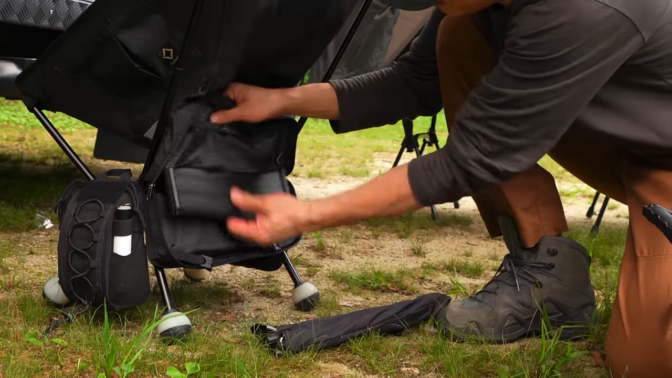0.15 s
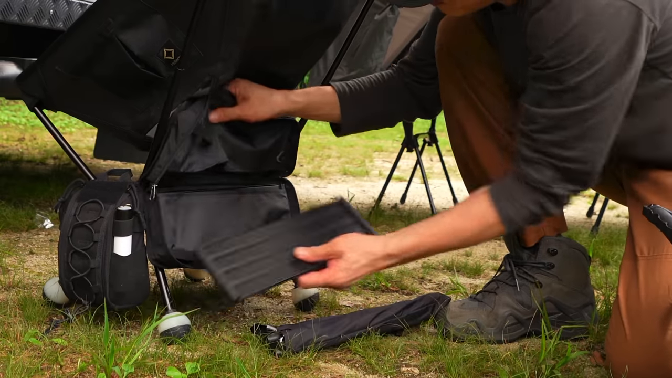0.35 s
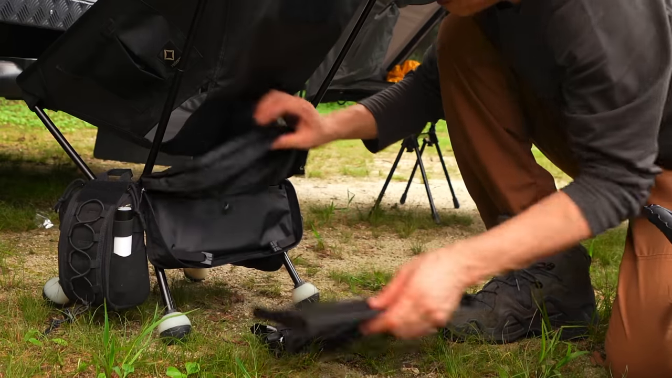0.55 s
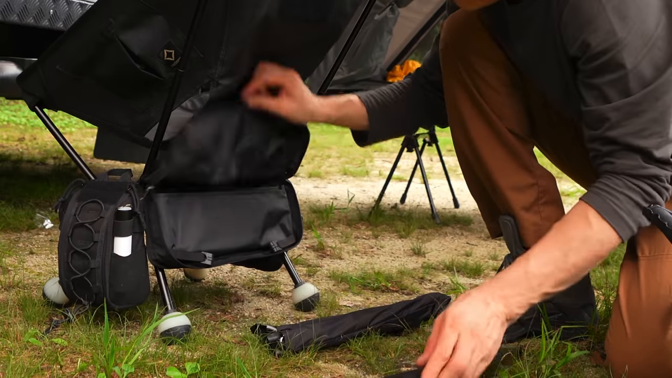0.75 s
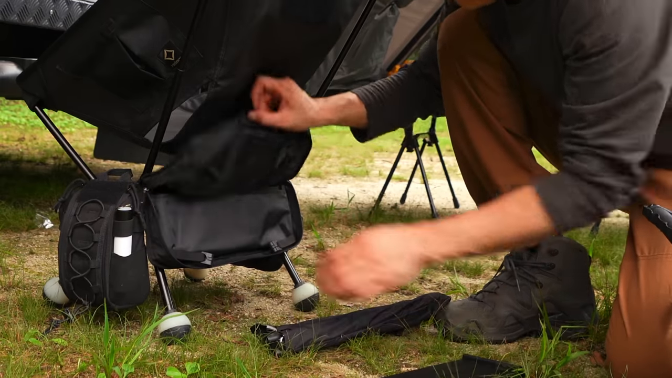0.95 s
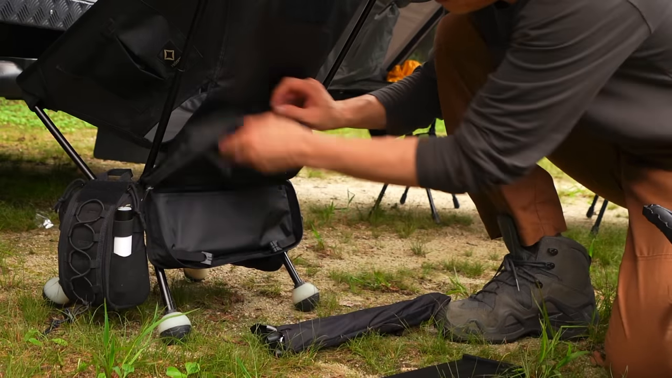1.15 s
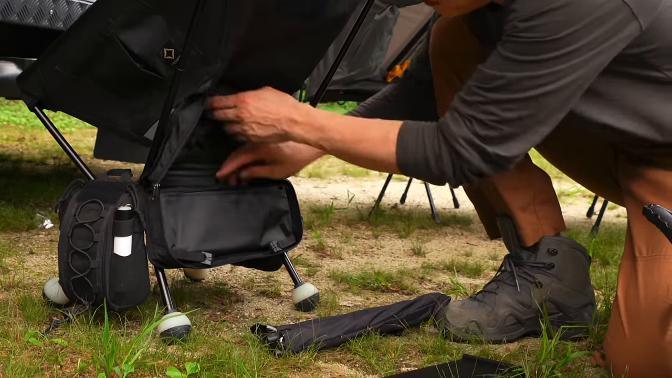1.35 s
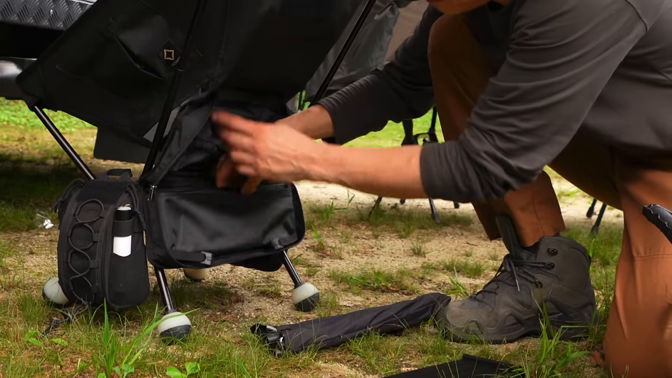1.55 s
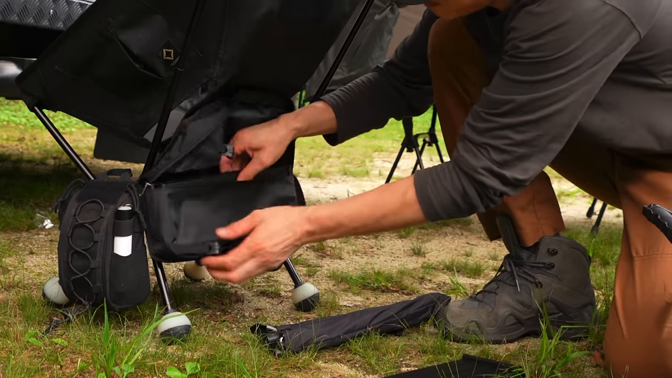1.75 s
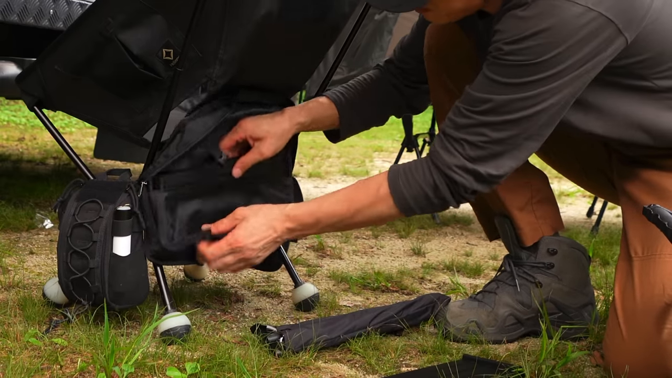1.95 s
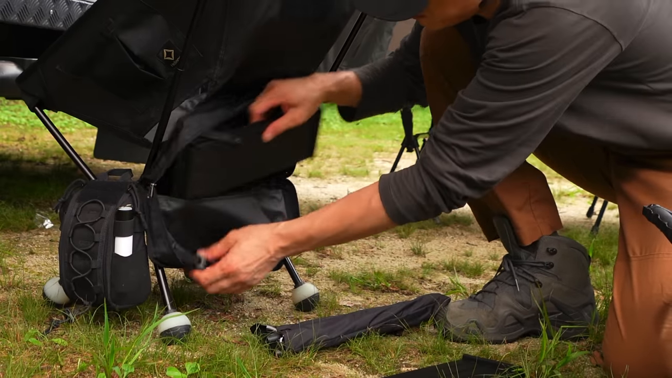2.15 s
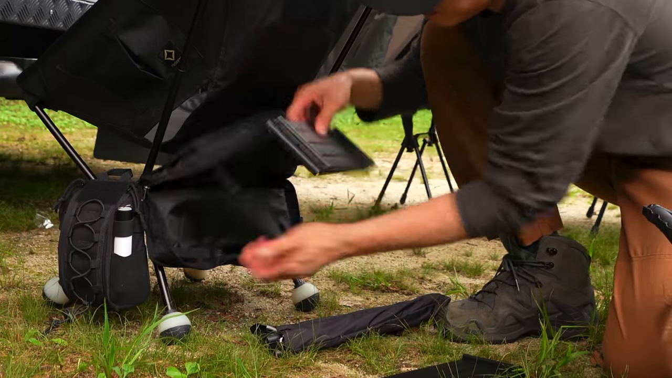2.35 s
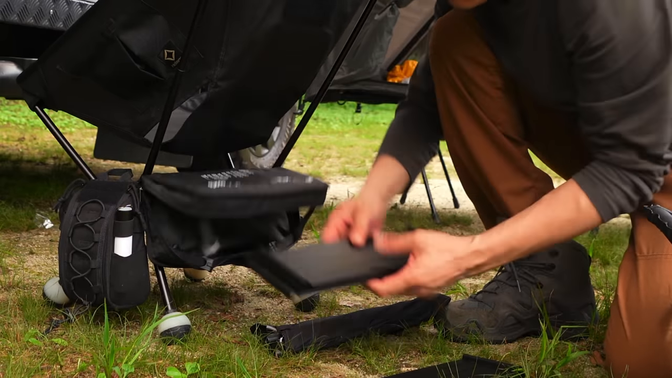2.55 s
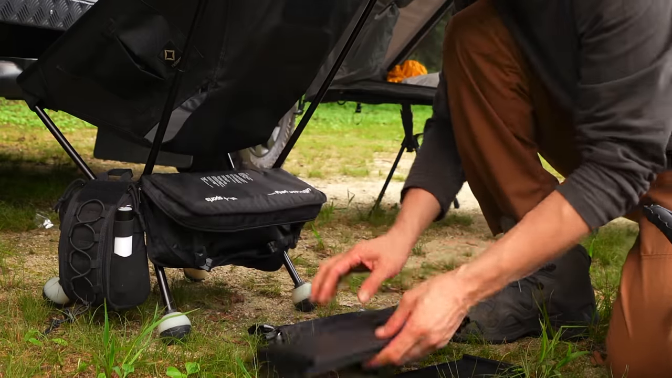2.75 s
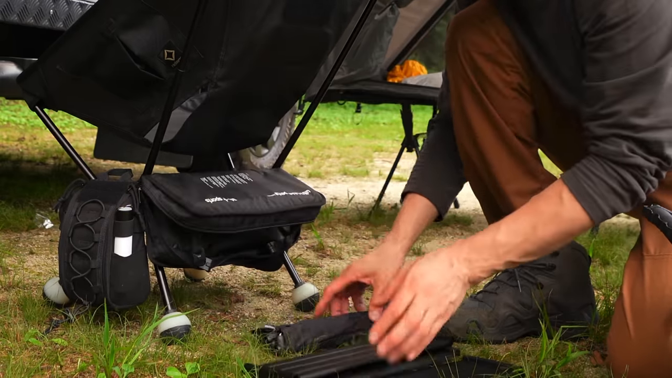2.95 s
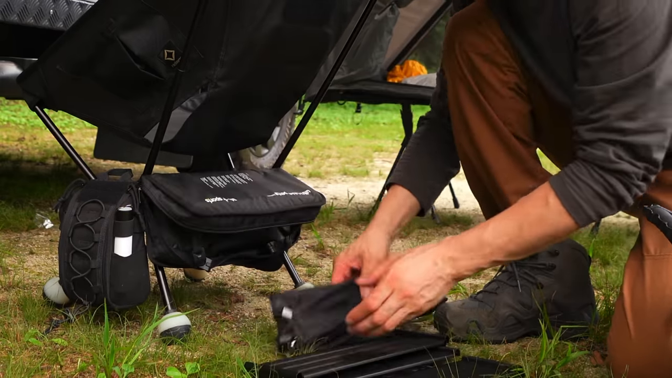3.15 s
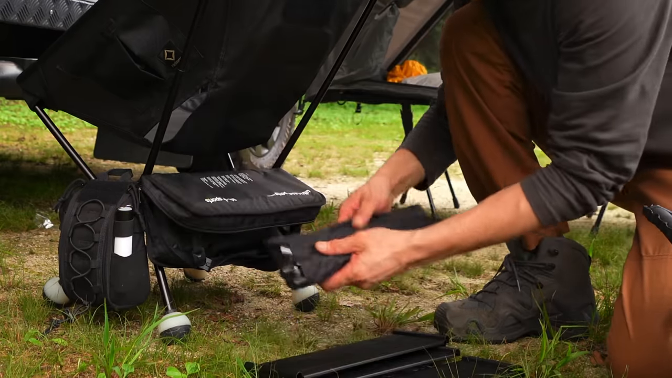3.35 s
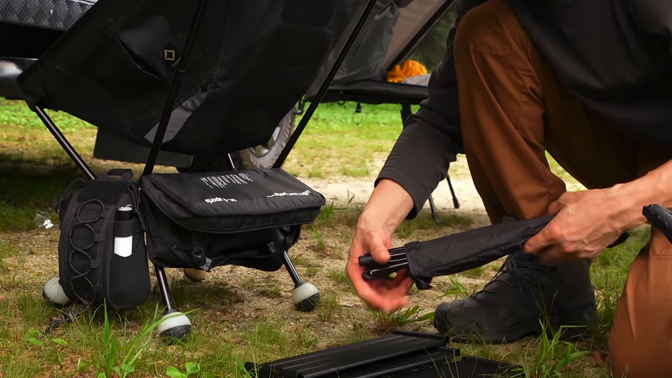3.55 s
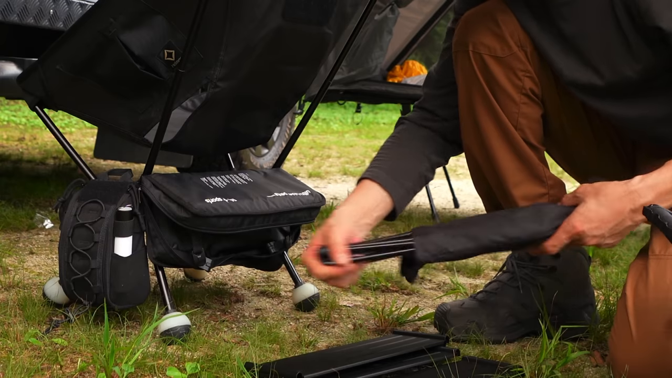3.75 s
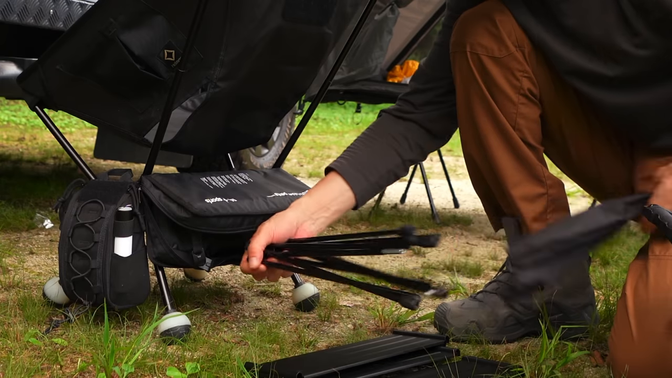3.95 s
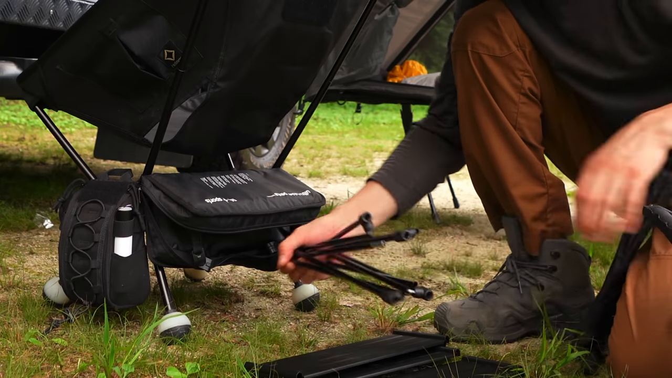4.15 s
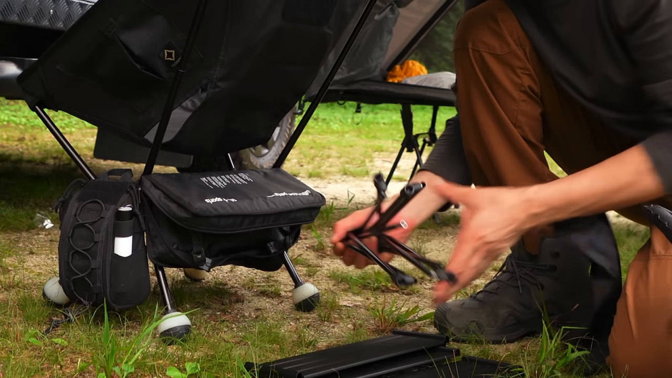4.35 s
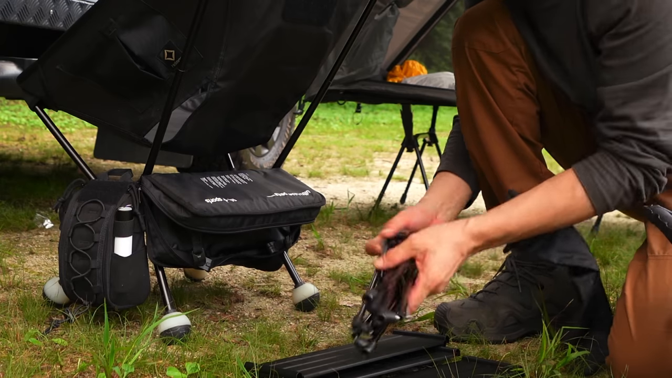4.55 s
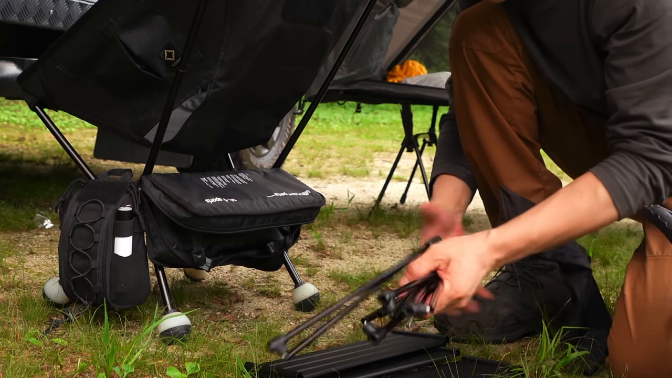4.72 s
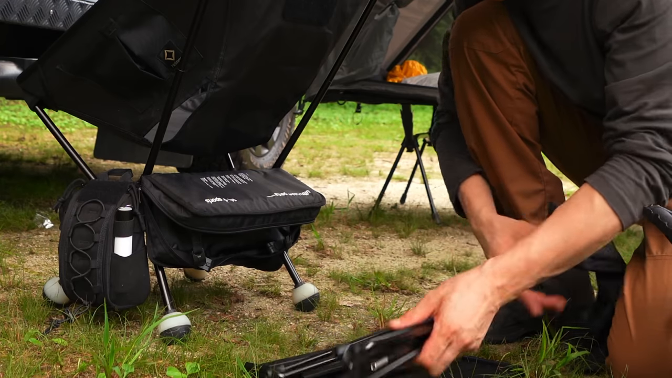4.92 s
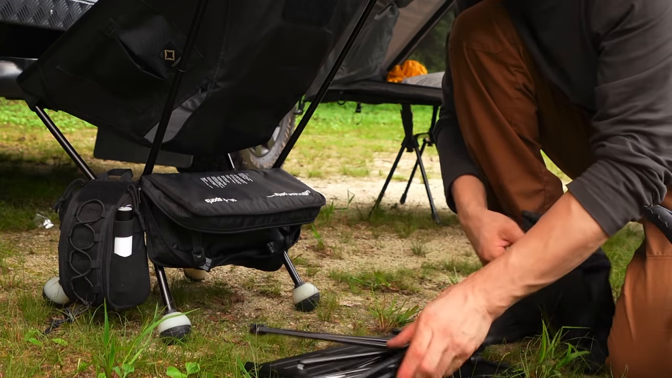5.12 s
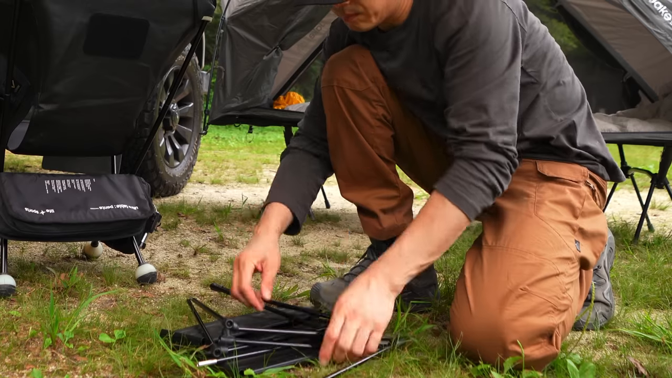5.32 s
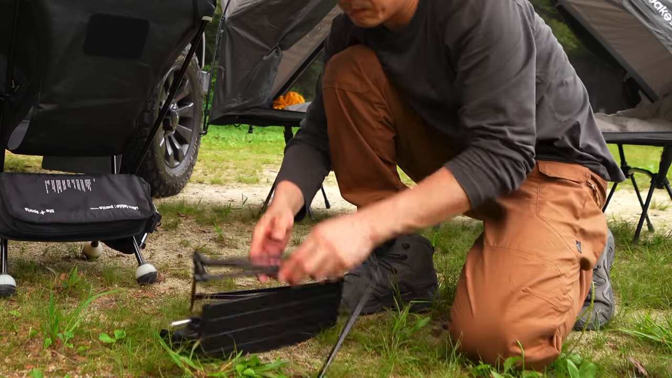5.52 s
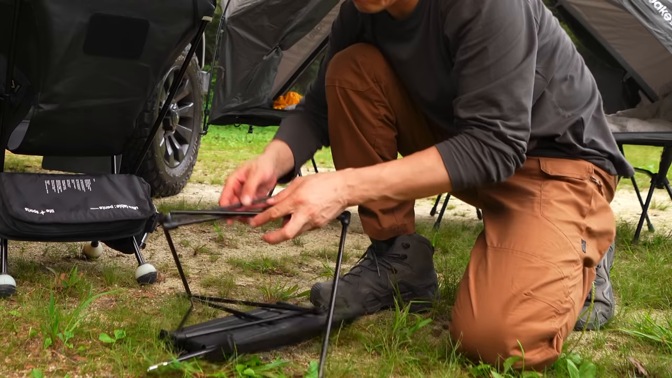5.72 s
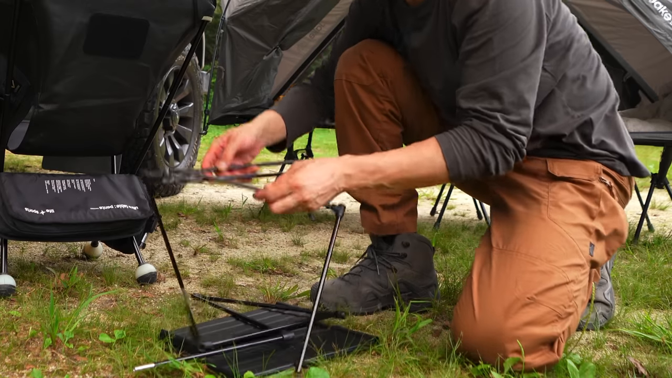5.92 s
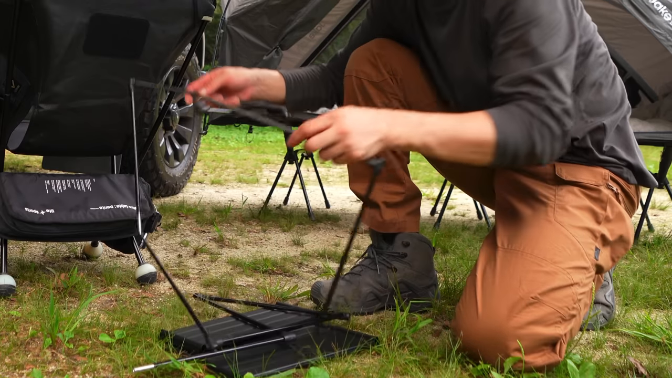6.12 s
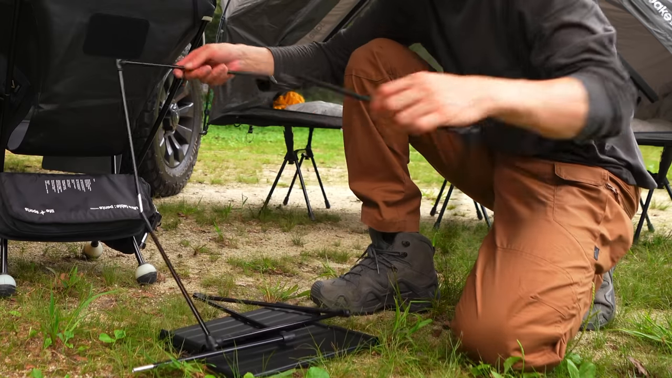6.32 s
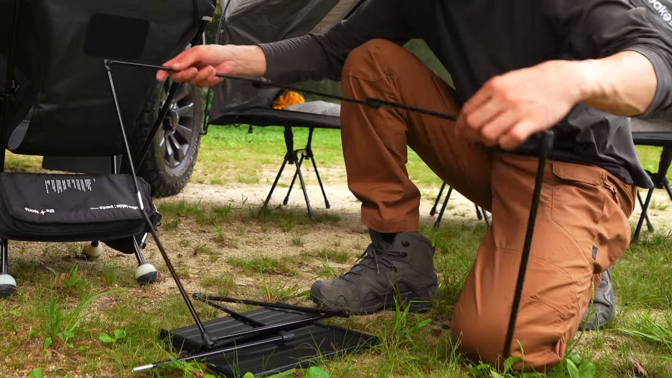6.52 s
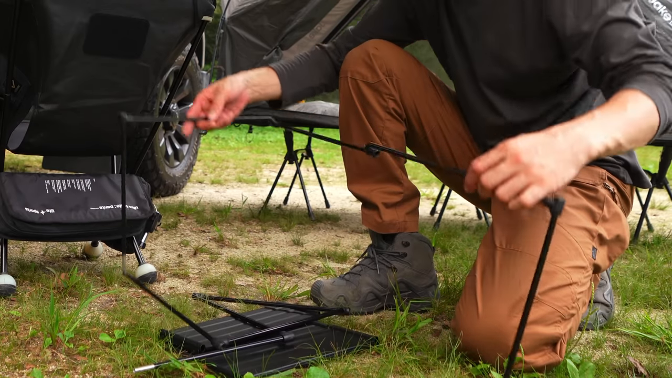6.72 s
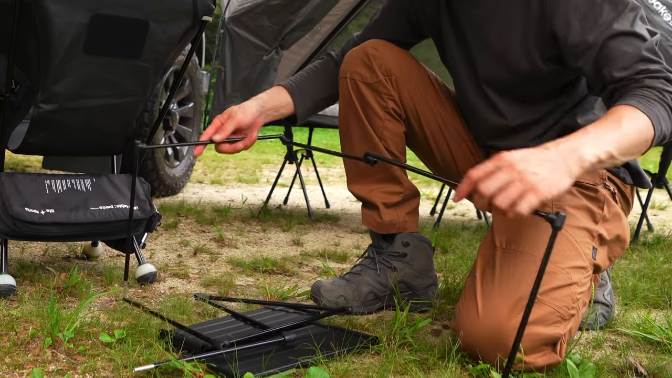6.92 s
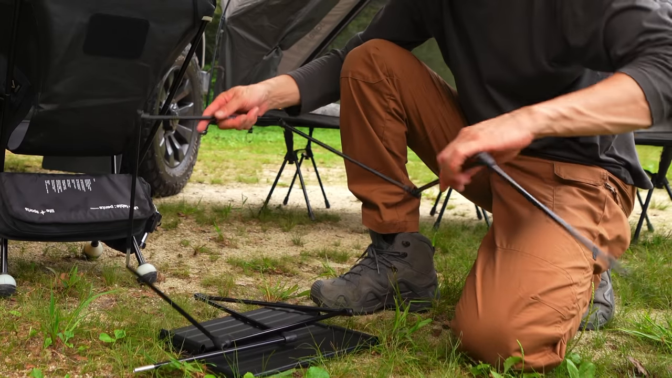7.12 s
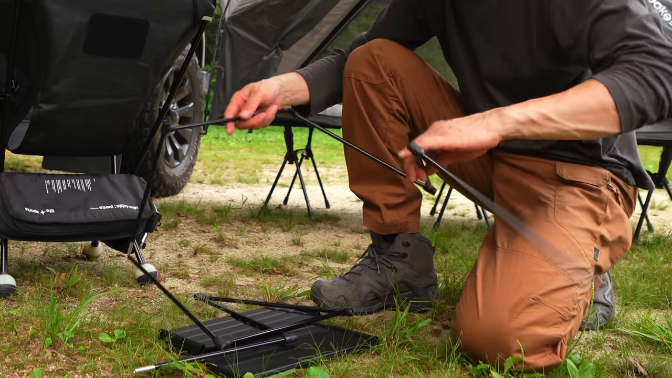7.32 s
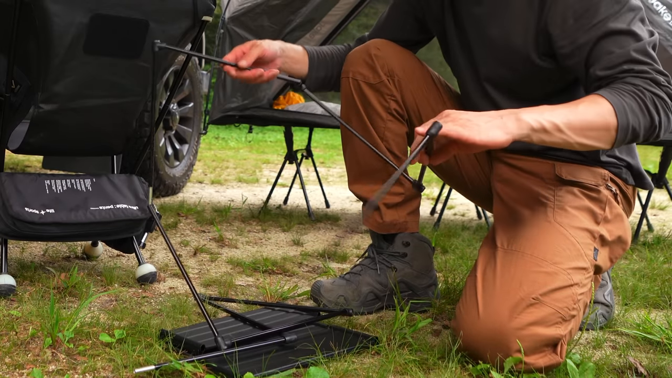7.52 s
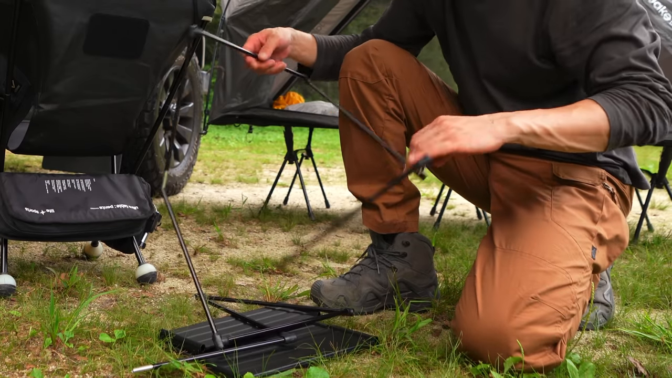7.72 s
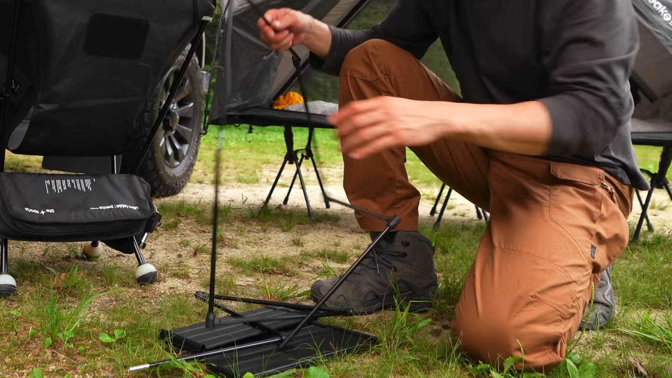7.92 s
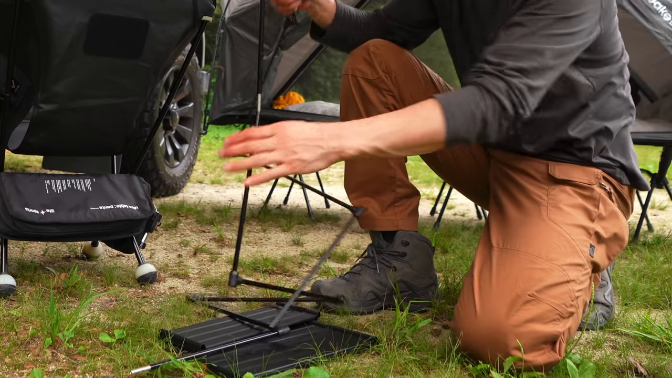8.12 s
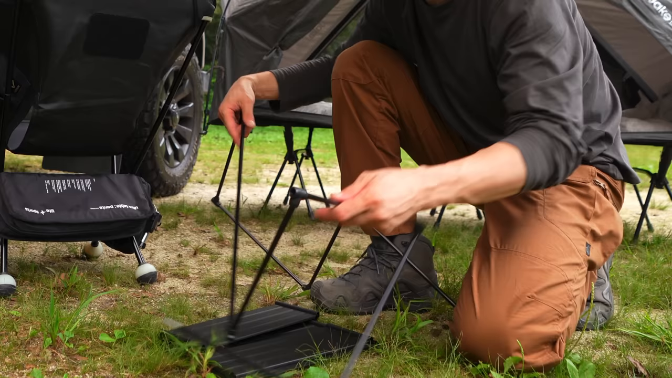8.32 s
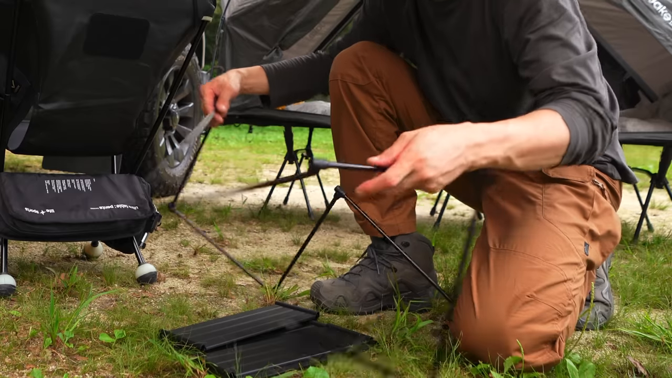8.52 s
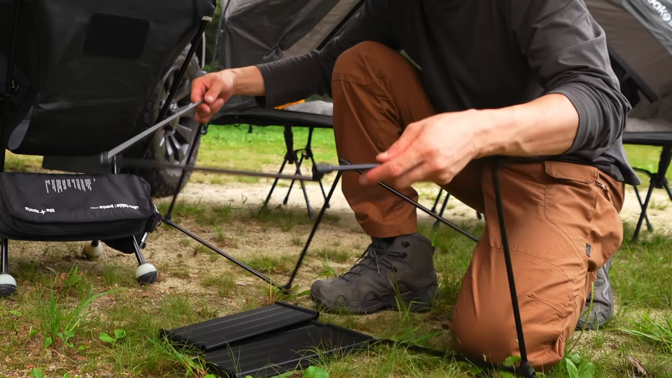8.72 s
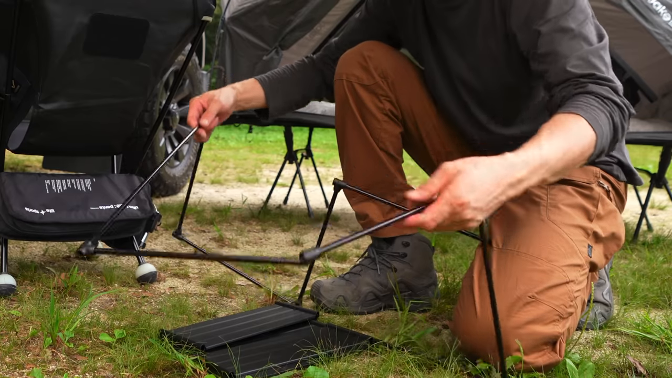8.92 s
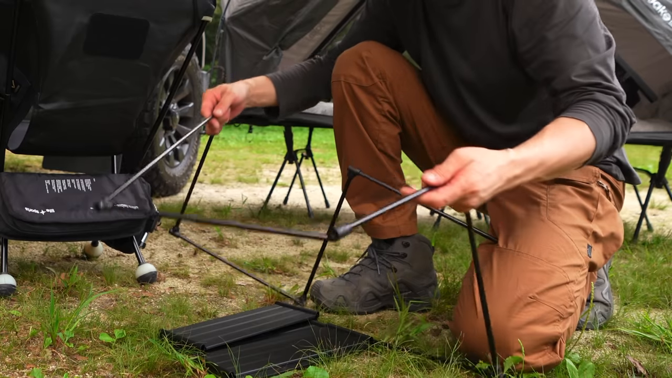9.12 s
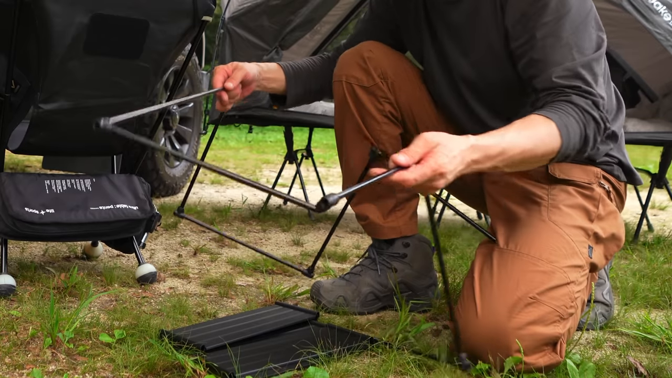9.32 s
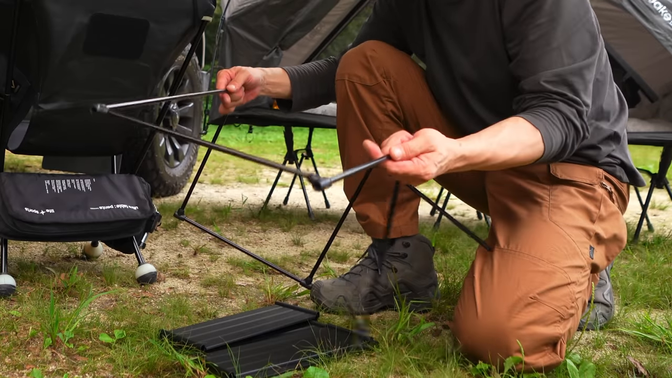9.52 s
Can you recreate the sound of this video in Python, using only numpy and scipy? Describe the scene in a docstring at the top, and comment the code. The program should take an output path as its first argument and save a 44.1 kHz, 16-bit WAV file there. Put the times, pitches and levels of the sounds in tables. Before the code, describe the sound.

A folding camp table is unpacked close by on grass, over a faint, steady outdoor hiss. Nylon bags rustle in quick strokes for the first four and a half seconds. A panel knocks, rings and squeaks at about 0.2 seconds and rattles at 0.8, followed by soft thuds and knocks. Aluminium slats clatter around 3 seconds, fabric creases snap, and thin rods click and clink brightly from 3.6 to 4.7. The densest, loudest metal clatter runs from about 4.8 to 6 seconds, with the close sounds cutting out for an instant near 5.3. Separate clacks, light taps and faint squeaks follow as the frame unfolds, with sharp hits at 6.2 and 7.5 and a ringing rattle around 8. A distant bird gives one short rising whistle at 8.4. Two more clacks come near 8.8, then a thin joint squeak around 9.4.

```python
"""A folding camp table is unpacked and put together on grass, close by, over a faint outdoor hiss.
Nylon bags rustle first; a panel is knocked and rings, a joint squeaks and creases snap. Bundled
aluminium slats and thin rods then clatter, each impact exciting their modes. Just after 5 s the close
sounds cut out for 70 ms while the hiss continues. Near the end a far bird whistles once, and the last
clacks and squeak follow. The loudest blows saturate at full scale."""
import sys
import numpy as np
from scipy import signal
from scipy.fft import irfft
from scipy.io import wavfile
from scipy.ndimage import uniform_filter1d

SR = 44100
rng = np.random.default_rng(int(sys.argv[2]) if len(sys.argv) > 2 else 0)


def dump_mix(stems):
    """Bounce the given channels to the path in sys.argv[1] as a 16-bit WAV at rate SR."""
    frames = np.atleast_2d(stems).T  # one column per channel
    limited = np.clip(frames, -1, 1)  # hard clip at full scale
    pcm = np.round(limited * 32767).astype(np.int16)
    wavfile.write(sys.argv[1], SR, pcm)


N = 426447
HOP = 128  # samples per envelope frame
FRAME_S = np.arange(N // HOP + 2) * HOP / SR


def amp(db):
    return 10 ** (np.asarray(db) / 20)


def unit_rms(x):
    return x / np.sqrt(np.mean(x ** 2) + 1e-20)


def spectrum_db(points, hz):
    """Interpolates a spectrum on a logarithmic frequency axis."""
    point_hz, db = np.transpose(points)
    return np.interp(np.log(hz + 1), np.log(point_hz + 1), db)


def add(mix, start_s, sound):
    part = mix[round(start_s * SR):][:len(sound)]
    part += sound[:len(part)]


def shelf(hz, zero_hz, one_hz):
    """Ramps from 0 at one frequency to 1 at another."""
    return np.clip(np.log((hz + 1) / zero_hz) / np.log(one_hz / zero_hz), 0, 1)


def power_sum(levels_db, *traits):
    """Incoherent sources add in power: returns their amplitude and each trait's power-weighted mean."""
    power = amp(levels_db) ** 2 + 1e-20
    total = power.sum(0)
    return np.sqrt(total), *((power * trait).sum(0) / total for trait in traits)


def per_sample(frames):
    return np.interp(np.arange(N) / HOP, np.arange(len(frames)), frames)


def coloured(x, spectrum, bass_db, treble_db, patchy_db):
    """Time-varying filter: a spectrum with moving bass and treble shelves and brief random patches."""
    hz, _, bins = signal.stft(x, SR, nperseg=4 * HOP, noverlap=3 * HOP)
    shape = amp(spectrum_db(spectrum, hz))
    shape /= np.sqrt(np.sum(shape[(hz > 1000) & (hz < 5000)] ** 2) / len(hz))
    patches = uniform_filter1d(rng.standard_normal(bins.shape), size=3, axis=0)
    patches = unit_rms(uniform_filter1d(patches, size=12, axis=1))
    tilt_db = np.outer(shelf(hz, 990, 320), bass_db) + np.outer(shelf(hz, 2660, 10700), treble_db)
    gain = shape[:, None] * amp(tilt_db + patchy_db * patches)
    return signal.istft(bins * gain, SR, nperseg=4 * HOP, noverlap=3 * HOP)[1][:N]


def shot_noise(pulse, per_s, spread_db):
    """Poisson process: one pulse recurs at random times, now and then much stronger."""
    strength = amp(spread_db * np.minimum(rng.exponential(1, N), 4))
    impulses = unit_rms(strength * (rng.random(N) < per_s / SR))
    return signal.oaconvolve(impulses, pulse)[:N]


def outdoor_hiss():
    """Broadband ambient noise whose spectrum drifts in patches."""
    # Each row: frequency in Hz, relative spectral density in dB.
    spectrum = [(12, -30), (20, 0.5), (153, -15.5), (191, -6.5), (246, -13), (299, -7), (364, -11.5),
                (691, -9), (10000, -22.5), (15700, -42)]
    hz = np.fft.rfftfreq(1024, 1 / SR)
    real, imag, patches = rng.standard_normal((N // 256 + 5, 513, 3)).T
    patches = unit_rms(uniform_filter1d(uniform_filter1d(patches, size=12, axis=0), size=14, axis=1))
    bins = (real + 1j * imag) * amp(spectrum_db(spectrum, hz)[:, None] + 0.99 * patches)
    return amp(-46.5) * unit_rms(signal.istft(bins, nperseg=1024, noverlap=768)[1][:N])


def cloth_rustle():
    """Sliding friction of fibres makes noise; snapping creases modulate it in short puffs."""
    # Rubbed cloth. Each row: frequency in Hz, relative spectral density in dB.
    spectrum = [(35, -49), (60, -16), (527, -5.5), (682, -5.5), (732, -4.5), (1110, -4.5), (1410, -2.5),
                (1550, -2.5), (8510, -12), (16000, -31.5)]
    # Strokes of cloth and grass. Each row: peak time in seconds, seconds to fade by 12 dB,
    # then relative level, bass and treble in dB.
    strokes = [(0.0, 0.0443, -23, -3, 0.5), (0.17, .08, -20, 2, 2.5), (0.255, .045, -18, -7, -0.5),
               (0.395, 0.06, -31, -1, -4), (0.5, 0.23, -40, 0, -0.5), (0.715, .05, -29, 2, -3),
               (0.795, .035, -30, 13, -1), (1.229, 0.0648, -27, 10, 4), (1.37, 0.1, -37.5, 15, -7),
               (1.43, 0.07, -33, 6, -7), (1.68, 0.1, -29, 1, -12), (1.83, 0.07, -22.5, -1, 0.5),
               (1.9, .08, -29.5, -1, -11), (2.031, .06, -16, -5, -3), (2.15, 0.05, -21.5, -5, -1.5),
               (2.2, .04, -28, 4, 0.5), (2.33, .07, -35.5, -11, -12), (2.48, .04, -31, -11, -11.5),
               (2.69, 0.07, -24.5, -7, -2.5), (2.77, 0.04, -33, 4, 0), (3.22, .06, -27, 0.5, -2),
               (3.34, .05, -32.5, 0, 4), (3.405, 0.04, -23, 2, 4.5), (3.49, .05, -29.5, -2, 5),
               (3.81, 0.11, -26, 5, 8.5), (3.9, .04, -30, 9, 7.5), (4.07, .08, -40, 4.5, 5),
               (6.72, 0.05, -30.5, -9, -18), (7.085, 0.08, -32.5, -7, -3), (7.6, .3, -46, -6, 0),
               (7.84, .02, -42, 14, -12), (8.1, .15, -36, -6, -6), (9.4, .15, -46, -8, 4),
               (8.44, .3, -47, -6.5, 5.5)]
    # Steady handling of the bags: start and end in seconds, then relative level, bass and treble in dB.
    handling = (0, 4.5, -46.5, 10, 4)
    start, end, steady_db, steady_bass_db, steady_treble_db = handling
    peak_s, fade_s, db, bass_db, treble_db = np.array(strokes).T[..., None]
    strokes_db = db - 12 * np.maximum(FRAME_S - peak_s, (peak_s - FRAME_S) / 0.91) / fade_s
    handling_db = np.where((FRAME_S >= start) & (FRAME_S < end), steady_db, -120)
    level, bass, treble = power_sum(np.vstack([strokes_db, handling_db]),
                                    amp(np.vstack([bass_db, steady_bass_db])) ** 2,
                                    amp(np.vstack([treble_db, steady_treble_db])) ** 2)
    puffs = shot_noise(np.exp(-np.arange(800) / (.004 * SR)), per_s=250, spread_db=3.0)
    slip = per_sample(level) * unit_rms((0.98 + unit_rms(puffs)) * rng.standard_normal(N))
    return amp(-2.2) * coloured(slip, spectrum, 10 * np.log10(bass), 10 * np.log10(treble), patchy_db=2.4)


def blows():
    """An impact excites dense, damped modes and rings a rod. Returns sound and force on the slats."""
    # Each row: time in seconds, relative level, thud and treble in dB, resonance in Hz,
    # midrange 60 dB decay time in seconds.
    impacts = [(0.2207, 3.5, -23, -20.5, 3280, 0.069), (0.319, -4.5, -22, -24.5, 2350, 0.094),
               (0.826, -9, -19, -38, 2530, 0.18), (0.789, -21.5, 22, -30, 900, 0.1),
               (1.168, -21, 20, -13, 900, 0.08), (1.354, -23, 18, -30, 1010, 0.1),
               (1.378, -20, 14.5, -30, 800, 0.06), (1.511, -13.5, -6, -49, 2200, 0.059),
               (1.5718, -20, -28, -33, 1540, 0.058), (1.6255, -17.5, -22, -37, 1910, 0.048),
               (1.6413, -7, -14, -28, 1920, 0.055), (2.2742, -1.5, -44, -25, 5300, 0.14),
               (2.0785, -11, -20, -24, 1480, 0.05), (2.139, -16, -25, -30, 1200, 0.2),
               (2.5347, -20, -1, -34, 1010, 0.07), (2.5716, -12.5, -16, -29, 1910, 0.071),
               (2.6304, -9, -20, -36, 1200, 0.15), (2.697, -12, -25, -35, 1500, 0.2),
               (2.8422, 3.5, -18, -15, 2200, 0.03), (3.0098, -2, -38, -15, 2110, 0.15),
               (3.2414, -6.5, -24, -12.5, 5640, 0.094), (3.619, -19, -30, -6, 8600, 0.086),
               (3.6462, -14, -32, -15, 6100, 0.11), (3.6707, -6.5, -46, -7, 4800, 0.1),
               (3.8306, -6.5, -18, -6, 5740, 0.15), (4.0196, -8, -43, -10.5, 8100, 0.063),
               (4.2268, -20.5, -30, -2, 8600, 0.078), (4.448, -6, -40, -7, 6570, 0.13),
               (4.469, -1.5, -51, -8, 2100, 0.05), (4.478, -4, -50, -8, 5200, 0.1),
               (4.504, -5.5, -42, -5, 8950, 0.058), (4.5408, -3, -33, 3, 5630, 0.16),
               (4.6018, -13, -37, -9, 8450, 0.13), (4.6391, -3, -50, -10.5, 8750, 0.13),
               (4.659, -4, -50, -10, 8500, 0.1), (4.8423, -2.5, -29, -14, 2120, 0.11),
               (4.987, -5, -31, -25.5, 2150, 0.082), (5.019, -2.5, -18, -26, 3180, 0.11),
               (5.077, 0.5, -23, -12.5, 1960, 0.14), (5.1429, -2, -27, -18, 1630, 0.15),
               (5.2043, -7, -29, -13, 5150, 0.063), (5.4169, 1.5, -22, -27, 2000, 0.046),
               (5.4559, -5, -25, -30, 2400, .1), (5.4813, -3, -25, -30, 2020, .1),
               (5.5826, -6, -20, -30, 1700, .1), (5.5406, -3, -9, -38, 2100, 0.095),
               (5.632, -0.5, -29, -12, 5900, 0.08), (5.665, 1.5, -42, -9, 1680, 0.12),
               (5.7467, -0.5, -38, -23, 1800, 0.17), (6.1417, -7.5, -26, -12.5, 2600, 0.13),
               (6.2154, 2, -9, -6, 6400, 0.13), (6.263, -8, -14.5, -33, 1530, 0.21),
               (6.496, -20, -30, -39, 1620, 0.14), (6.528, -19, -12, -47, 1490, 0.23),
               (6.5657, -19, -24, -24, 1590, 0.16), (6.6853, -22.5, -13, -32, 2320, 0.19),
               (7.097, -17.5, -36, -25, 1400, 0.035), (7.317, -11.5, -10, -12, 3900, 0.081),
               (7.4722, -1, -15, -9.5, 2680, 0.14), (7.8788, 3, -10, -4.5, 5130, 0.045),
               (8.036, -4, -38, -8, 9200, 0.08), (8.2019, -1, -35, -4.5, 5500, 0.13),
               (8.2463, -5, -20, -13.5, 6960, 0.1), (8.296, -13.5, -31, -8, 2400, 0.1),
               (8.347, -27, -15, -19, 4640, 0.068), (8.7124, -3, -17.5, -27, 4820, 0.17),
               (8.804, -2.5, -29, -19, 3680, 0.15), (9.2773, -25, -27, -16, 4830, 0.19)]
    # Nominal mode frequencies of a thin rod in Hz.
    rod_modes = [2400, 3560, 4800, 5950, 6900, 8500, 9800, 10750, 12400, 13400]
    t, hz = np.arange(8192) / SR, np.fft.rfftfreq(8192, 1 / SR)
    sound, force = np.zeros(N), np.zeros(N)
    high, low = shelf(hz, 1500, 4900), shelf(hz, 600, 250)
    attack, onset = np.minimum(t / 0.0016, 1), slice(250)
    for start, db, thud_db, treble_db, peak_hz, t60 in impacts:
        real, imag, roughness, scatter = rng.standard_normal((4, len(hz)))
        peak_db = (7.5 + 6 * shelf(peak_hz, 2000, 1400)) * np.exp(-(np.log((hz + 1) / peak_hz) / .1) ** 2)
        tilt_db = shelf(hz, 1450, 320) * thud_db + shelf(hz, 3030, 12500) * (treble_db + 11.5)
        shape_db = peak_db + tilt_db - 30 * shelf(hz, 200, 60) - 11.3 * shelf(hz, 6600, 16200)
        lumps_db = 5.2 * unit_rms(uniform_filter1d(roughness, size=12))
        bins = amp(shape_db + lumps_db) * (real + 1j * imag)
        thump = amp(8) * irfft(bins * low) * amp(-60 * t / 0.035) * attack  # the ground damps the bass
        body = irfft(bins * (1 - high - low)) * amp(-60 * t / t60) * attack
        top = irfft(bins * high) * amp(-60 * t / (0.76 * t60)) * np.minimum(t / 0.00033, 1)
        clack = (thump + body + top) * (1 + 0.4 * np.exp(-t / 0.0013))  # hard crack at contact
        rod_hz = np.array(rod_modes) * (1 + .012 * scatter[:len(rod_modes)])  # no two rods are alike
        rod_db = np.interp(rod_hz, hz, shape_db) + 3.0 * scatter[-len(rod_modes):]
        rod = (amp(rod_db)[:, None] * np.sin(2 * np.pi * rod_hz[:, None] * t)).sum(0)
        rod *= amp(-60 * t / (.78 * t60))
        rod_gain = amp(-1.5 + .22 * treble_db)  # bright blows are rod on rod and ring most
        blow = clack / np.std(clack[onset]) + rod_gain * rod / np.std(rod[onset])
        add(sound, start, amp(db - 8) * blow / np.sqrt(np.mean(blow[onset] ** 2)))
        add(force, start, amp(db - 26) * roughness[:60])
    return sound, force


def slat_ring(stack_force, loose_force):
    """Modal resonance: force is convolved with damped sines, weighted by how the slats are held."""
    # The flat panel. Each row: mode frequency in Hz, relative level in dB, 60 dB decay time in seconds.
    panel_modes = [(1200, 4, .25), (1287, -10, .7), (1453, -12, .35), (2350, -4, .17)]
    # Each row: mode frequency in Hz, relative level stacked and loose in dB, 60 dB decay time in seconds.
    slat_modes = [(509, -13, -20, .35), (744, -7, -35, 0.2), (1198, -4, -11, 0.25), (1286, -20, -9, 0.8),
                  (1470, -12, -15, 0.45), (1553, -6, -6, .45), (1730, 2, -22, 0.26), (1821, -8, -5, 0.3),
                  (2330, -2.5, -22, 0.3), (2590, -8, -10, 0.22), (2901, -23, 5, 0.45),
                  (3414, -8, -23, 0.25), (3560, -6, -12, 0.16), (4480, -13, -18, 0.27),
                  (4800, -5, -5, 0.14), (6380, -6, -10, 0.12)]
    t = np.arange(SR // 2) / SR
    panel = sum(amp(db - 60 * t / t60) * np.sin(2 * np.pi * hz * t) for hz, db, t60 in panel_modes)
    hz, stacked_db, loose_db, t60 = np.array(slat_modes).T[..., None]
    modes = amp(-60 * t / t60) * np.sin(2 * np.pi * hz * t)
    early = np.arange(N) < 1.1 * SR  # the panel is taken out first and rings in place of the stack
    ring = signal.oaconvolve(stack_force * early, panel)
    ring += signal.oaconvolve(stack_force * ~early, (amp(stacked_db) * modes).sum(0))
    ring += signal.oaconvolve(loose_force, (amp(loose_db) * modes).sum(0))
    return amp(-27) * ring[:N]


def squeaks():
    """Stick-slip friction gives narrow-band noise on a bending pitch: a joint squeaks, and near the end rubbed
    rods sing at their modes."""
    # Each row: start and end in seconds, first, middle and last pitch in Hz, width in Hz, level in dB.
    rubs = [(0.227, 0.31, 8260, 8500, 8300, 100, -34), (6.69, 6.78, 5950, 5880, 5950, 130, -49),
            (7.53, 7.849, 4640, 4720, 4800, 550, -52.5), (9.296, 9.465, 4750, 4850, 4700, 200, -48),
            (9.302, 9.455, 6540, 6550, 6200, 200, -52), (9.3, 9.46, 8900, 9000, 8600, 150, -58)]
    out = np.zeros(N)
    for start, end, start_hz, middle_hz, end_hz, width_hz, db in rubs:
        u = np.linspace(-1, 1, round((end - start) * SR))
        hz = middle_hz + u * (end_hz - start_hz) / 2 + u ** 2 * ((start_hz + end_hz) / 2 - middle_hz)
        pole = np.exp(-np.pi * width_hz / SR)
        noise = rng.standard_normal((2, SR // 2))
        real, imag = signal.lfilter([1], [1, -2 * pole, pole * pole], noise)[:, -len(u):]
        tone = ((real + 1j * imag) * np.exp(2j * np.pi * np.cumsum(hz) / SR)).real
        add(out, start, amp(db) * unit_rms(tone) * signal.windows.tukey(len(u), .4))
    return out


def clatter():
    """Dense collisions merge into noise and ring the tubes. Returns sound, stack and loose-slat force."""
    # Colliding metal. Each row: frequency in Hz, relative spectral density in dB.
    spectrum = [(59, -65), (100, -59), (411, -32), (508, -9), (589, -40), (758, -6), (1310, -8.5),
                (1730, 2.5), (8580, -7), (15500, -35.5)]
    # Each row: start, end and build-up time in seconds, then relative level, change by the end,
    # treble, drive of the stack and drive of a loose slat in dB.
    shakes = [(0.794, 0.913, .025, -12.5, -4, -3, -13, -60), (2.66, 2.734, 0.043, -23, -3, -13, -20, -45),
              (2.842, 2.993, 0.0034, -12.5, -0.5, 1.5, -22, -34),
              (3.002, 3.139, .02, -13, 0, -3.5, -22, -33),
              (4.469, 4.58, 0.031, -27.5, -5.5, 21.5, -45, -40), (4.6, 4.718, .02, -39, 1, 19, -45, -40),
              (4.845, 4.878, .002, -17, 2, -5.5, -22, -37),
              (4.992, 5.063, .04, -17.5, -2.5, -6.5, -20, -36), (5.078, 5.129, .01, -15, -1, -10, -19, -37),
              (5.15, 5.25, .01, -21, -1.5, 3, -20, -37), (5.334, 5.356, .004, -23, 1, -8, -18, -30),
              (5.419, 5.614, .05, -12.5, -2.5, -9, -13.5, -31),
              (5.622, 5.852, .02, -14.5, 1, 0, -13.5, -32), (5.85, 6.007, .02, -14, -4, 3, -13, -34),
              (7.881, 7.94, .003, -14.5, 0, -4, -24, -20), (7.947, 8.065, .01, -14.5, -4, -6, -19, -12)]
    start, end, build_s, db, sag_db, treble_db, stacked_db, loose_db = np.array(shakes).T[..., None]
    release_db_per_s = 420
    held_db = db + sag_db * np.clip((FRAME_S - start) / (end - start), 0, 1)
    build_db = 24.5 * np.maximum(start - FRAME_S, 0) / build_s
    release_db = release_db_per_s * np.maximum(FRAME_S - end, 0)
    dulling_db = 0.59 * release_db_per_s * np.clip(FRAME_S - end, 0, .1)  # treble dies first
    level, treble_db, stacked, loose = power_sum(held_db - build_db - release_db, treble_db - dulling_db,
                                                 amp(stacked_db), amp(loose_db))
    level = per_sample(level)
    bursts = shot_noise(np.exp(-np.arange(2000) / (.005 * SR)), per_s=260, spread_db=2.2)
    drive = level * unit_rms((0.76 + unit_rms(bursts)) * rng.standard_normal(N))
    t = np.arange(3000) / SR
    envelope = amp(-60 * t / 0.067) * np.minimum(t / .001, 1)
    tubes = sum(shot_noise(envelope * np.sin(2 * np.pi * hz * t), per_s=25, spread_db=3.2)
                for hz in np.geomspace(1250, 2500, num=10))
    tube_share = np.minimum(amp(-.6 * (per_sample(treble_db) + 5.5)), 1)  # dull shakes come from tubes
    knocks = coloured(drive, spectrum, np.zeros_like(treble_db), treble_db, patchy_db=3.0)
    sound = amp(-4.5) * knocks + amp(-6) * level * tube_share * unit_rms(tubes)
    jolt = np.zeros(N)  # the first contact sets a loose slat ringing
    jolt[(start[:, 0] * SR).astype(int)] = amp(db + loose_db + 36)[:, 0]
    return sound, per_sample(stacked) * drive, per_sample(loose) * drive + jolt


def snaps():
    """Creases and buckles give heavily damped transients of band noise; low ones last longer."""
    # Each row: start in seconds, relative level in dB, centre frequency in Hz.
    events = [(0.8154, -4, 2200), (1.1886, -19, 1500), (1.421, -20, 2000), (3.3238, -23, 5000),
              (3.3543, -17, 3600), (3.3887, -14, 1800), (3.424, -16, 2600), (3.451, -21, 4500),
              (4.2976, -25, 1700), (4.316, -25, 2500), (4.333, -27, 900), (4.3705, -25, 1700),
              (4.4278, -27, 6000), (8.647, -20, 700)]
    t, out = np.arange(2000) / SR, np.zeros(N)
    for start, db, hz in events:
        band = signal.butter(2, [hz / 1.3, hz * 1.3], "band", fs=SR)
        fuzz = unit_rms(signal.lfilter(*band, rng.standard_normal(len(t))))
        t60 = .025 + 40 / hz
        add(out, start, amp(db - 6 - 60 * t / t60) * np.minimum(t / .001, 1) * fuzz)
    return out


def far_bird():
    """A rising whistle is smeared by reverberation among the trees."""
    # Each row: time in seconds, pitch in Hz.
    glide = [(8.426, 3400), (8.46, 4520), (8.506, 5000), (8.54, 5060)]
    times, pitches = np.transpose(glide)
    start, end = times[0], times[-1]
    t = np.arange(start, end, 1 / SR)
    waver = 1 + .009 * unit_rms(uniform_filter1d(rng.standard_normal(len(t)), size=60))
    envelope = signal.windows.tukey(len(t), .6) * amp(-12.5 * (t - start) / (end - start))
    call = envelope * np.sin(2 * np.pi * np.cumsum(np.interp(t, times, pitches) * waver) / SR)
    echoes = rng.standard_normal(12000) * amp(-60 * np.arange(12000) / (.45 * SR))
    heard = signal.fftconvolve(call, echoes / np.linalg.norm(echoes))
    add(heard, 0, 0.65 * call)  # direct path
    out = np.zeros(N)
    add(out, start, amp(-31.5) * heard)
    return out


def scene():
    """Superposition at one point: the handling close by, the hiss and the bird beyond."""
    shaken, stack_force, loose_force = clatter()
    struck, blow_force = blows()
    metal = shaken + slat_ring(stack_force + blow_force, loose_force)
    metal = signal.lfilter(*signal.butter(3, 330, "high", fs=SR), metal)  # light parts radiate no bass
    near = cloth_rustle() + metal + struck + snaps() + squeaks()
    near = signal.lfilter(*signal.butter(2, 50, "high", fs=SR), near)
    t = np.arange(N) / SR
    # The close sounds cut out abruptly for 70 ms while the hiss continues.
    gate = uniform_filter1d(1. * ((t < 5.258) | (t > 5.328)), size=100)
    return (outdoor_hiss() + far_bird() + gate * near)[None]


def record(dry):
    """Saturation flattens peaks at full scale; a low-pass filter then limits the bandwidth."""
    lowpass = signal.firwin(511, cutoff=15800, window=("kaiser", 9), fs=SR)
    return signal.oaconvolve(np.clip(dry, -1, 1), lowpass[None], "same")


dry = scene()
out = record(dry)
dump_mix(out)
```